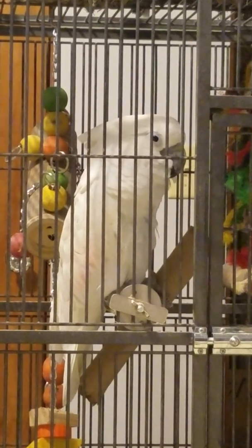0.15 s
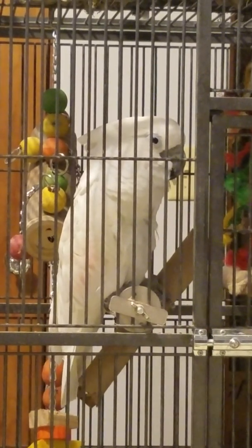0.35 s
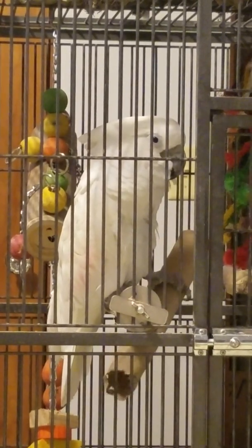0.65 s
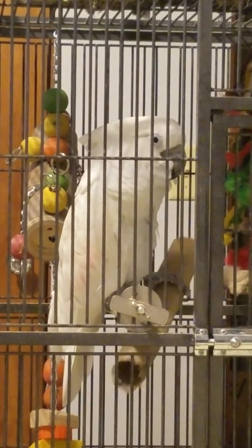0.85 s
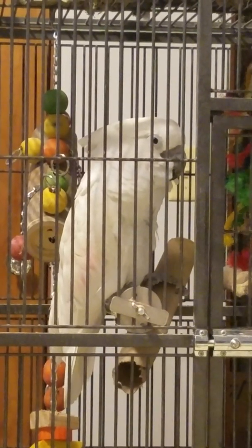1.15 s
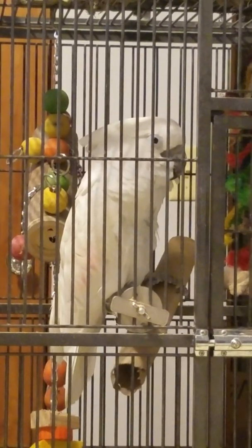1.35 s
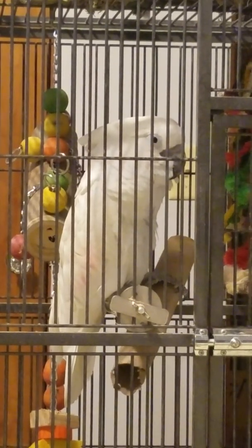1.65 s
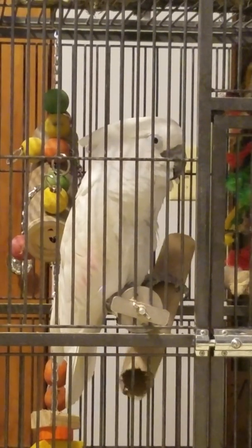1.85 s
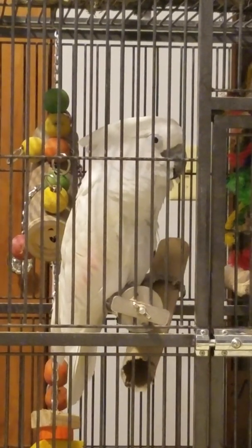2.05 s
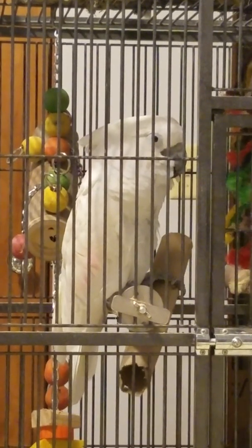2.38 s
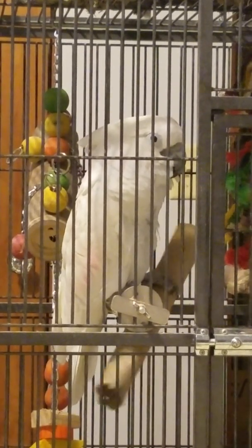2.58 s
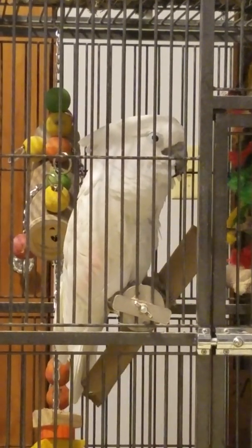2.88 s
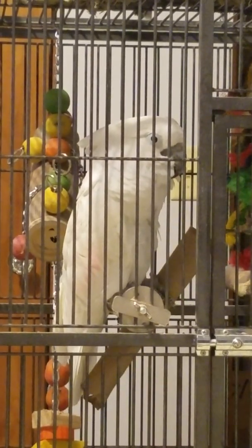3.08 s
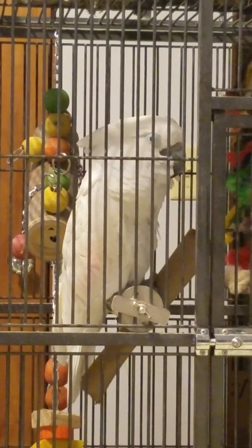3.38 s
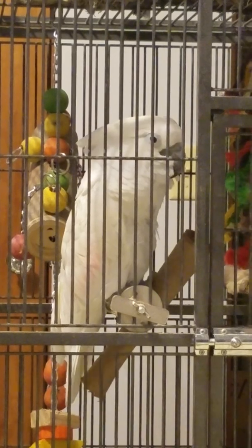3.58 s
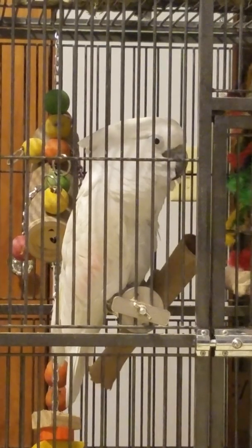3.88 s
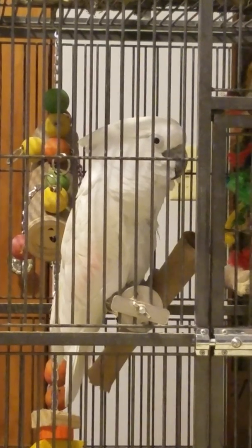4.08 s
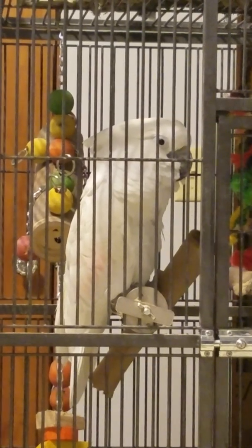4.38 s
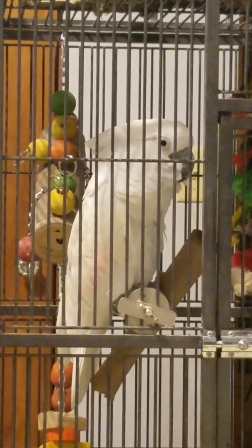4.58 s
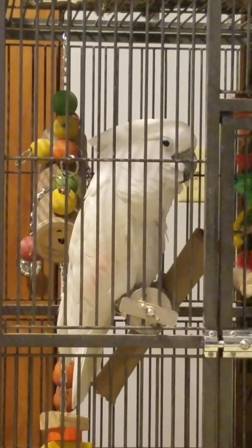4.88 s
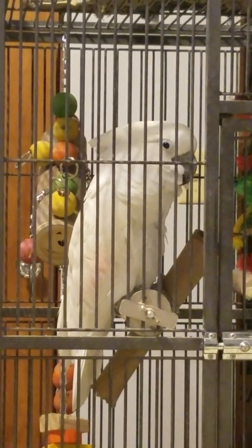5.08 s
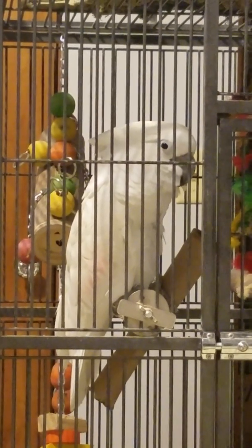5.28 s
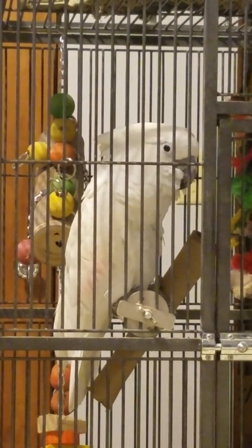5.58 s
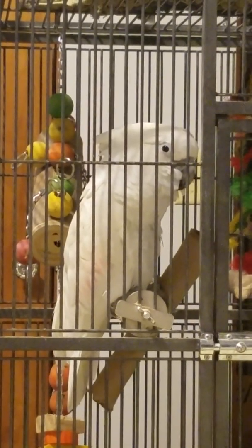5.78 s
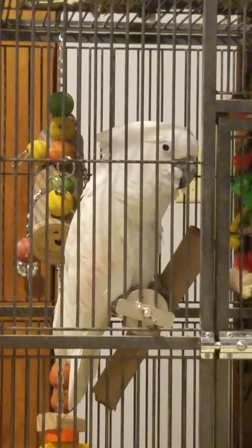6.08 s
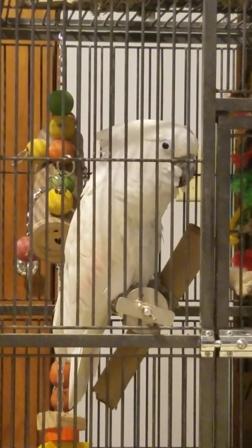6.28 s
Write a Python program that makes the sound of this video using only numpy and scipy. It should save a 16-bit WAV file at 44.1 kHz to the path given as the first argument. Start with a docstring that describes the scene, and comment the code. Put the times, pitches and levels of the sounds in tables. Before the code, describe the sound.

A caged parrot calls close to a stereo microphone in a reverberant room. Three rounded chirps come in the first second, followed by a squeal that climbs and cracks. Wood rattles and thumps a little further off. Then a hoarse squeal, a second short double burst, crisp beak snaps and a light regular clicking lead to a final rasping, whistling squeal. A steady soft fan hum lies beneath.

```python
"""Three mellow chirps of a caged cockatoo in a live room come first, then four rising squeals that break into rasp.
Each call is a bank of harmonics on a gliding pitch, shaped by the throat and roughened by slips, with hiss.
Between the calls the beak clicks, as short noise bursts; wood knocks and clatters further off, as rattles with
ringing modes. A ventilation hum of filtered noise and wavering tones lies under everything.
Decaying noise gives the room, and the two microphone ports colour the sound differently."""
import sys
import numpy as np
from scipy import signal
from scipy.fft import rfft, irfft
from scipy.io import wavfile
from scipy.ndimage import uniform_filter1d

SR = 44100
rng = np.random.default_rng(int(sys.argv[2]) if len(sys.argv) > 2 else 0)


def waveform_to_disk(signal):
    """Save audio, clipped to [-1, 1], as 16-bit WAV at the path in sys.argv[1]."""
    frames = np.transpose(np.atleast_2d(signal))
    scaled = np.clip(frames, -1, 1) * 32767
    samples = np.round(scaled).astype(np.int16)
    wavfile.write(sys.argv[1], SR, samples)


N = 284445
TIME = np.arange(N) / SR  # [s]
BINS = np.fft.rfftfreq(N, 1 / SR)  # [Hz]
TOP_HZ = 15850  # upper limit of the harmonics and of the ports


def undb(db):
    """Level to amplitude: 20 dB is a factor of ten."""
    return 10 ** (np.asarray(db) / 20)


def unit(x):
    """Normalization by signal power, to rms 1."""
    return x / np.sqrt(np.mean(x ** 2) + 1e-24)


def read(points, hz):
    """Interpolation of (frequency [Hz], value) on a logarithmic frequency axis."""
    f, value = np.transpose(points)
    return np.interp(np.log(np.maximum(hz, 1)), np.log(f), value)


def colour(x, db):
    """Minimum-phase filtering: folding the cepstrum makes a causal response from the dB at every bin."""
    cepstrum = irfft(np.log(undb(db)), N)
    cepstrum[1:N // 2] *= 2
    cepstrum[N // 2:] = 0
    return irfft(rfft(x) * np.exp(rfft(cepstrum)), N)


def flutter(size, hz):
    """Band-limited random motion: white noise low-passed at hz, with rms 1."""
    lowpass = signal.butter(2, hz, fs=SR, output="sos")
    return unit(signal.sosfilt(lowpass, rng.standard_normal(size)))


def add(track, s, sound):
    """Superposition of a sound on a track at time s."""
    start = max(int(s * SR), 0)
    track[start:start + len(sound)] += sound[:N - start]


def cockatoo(hiss_db=-26, chirp_hiss_db=-24):
    """Two-sided syrinx: mellow chirps and two-voiced squeals, with turbulent hiss that follows the tone."""
    # One row a note: (start [s], length [s], level [dB], attack [s], start pitch [Hz], top pitch [Hz],
    # rise [s], overtones re fundamental, ahead of the throat, at mid-note [dB], mid-note roughness [0-1])
    chirp_notes = [(0, 0.0986, -43.5, .004, 1318, 1453, 0.0491, 4, 0.26),
                   (.303, 0.1809, -41, 0.0124, 1233, 1737, .16, 6, 0.12),
                   (0.579, 0.367, -40.5, 0.0138, 1189, 1304, .075, 9.5, .075)]
    # Low, raspy side of the syrinx in the squeals; same columns
    rasp_notes = [(1.209, 0.15, -54, 0.058, 1894, 1975, 0.054, -11, 0.1068),
                  (1.295, 0.2142, -43, 0.019, 2027, 2582, 0.1756, -15, .27),
                  (3.411, 0.1624, -48.5, 0.055, 1745, 2474, .13, 2, .44),
                  (3.848, 0.087, -42.5, 0.0292, 1803, 2291, 0.054, 8, 0.49),
                  (3.96, .18, -45, 0.051, 2347, 2745, .115, 9, 0.6),
                  (5.34, 0.194, -50.5, 0.049, 1787, 2383, 0.113, 0.5, .4),
                  (5.525, .15, -46.5, 0.0554, 1900, 2382, .1, 3, 0.646)]
    # High side of the syrinx, whistling in the later squeals; same columns
    whistle_notes = [(3.499, 0.1503, -43, 0.0053, 3094, 3224, 0.0287, -7.5, 0.2),
                     (3.88, .175, -44, 0.0064, 2870, 3103, 0.02525, 6.5, 0.455),
                     (3.977, 0.073, -40, 0.0079, 4044, 4029, 0.0185, -33.5, 0.0955),
                     (5.42, 0.2664, -44.5, 0.0485, 2750, 3255, .055, -6, 0.31),
                     (5.645, 0.0376, -40.5, 0.0049, 3201, 3260, 0.014, -13, 0.1393),
                     (5.688, 0.0594, -38.5, 0.0117, 3290, 3278, 0.027, -12, 0.231)]
    # Spectrum of the hiss in the throat: (frequency [Hz], level [dB])
    hiss_colour = [(80, -56), (300, 8.5), (820, 3), (1300, -10), (3000, -2), (5600, -11), (8000, -16.5),
                   (10500, -15), (14000, -25.5)]

    # chirps are nearly pure: overtones fall steeply above the second harmonic
    chirps = sum(call(note, droop_octaves_per_s=1.4, dulling_db=10.5, fall_db=64,
                      sag=0.1334, waver=0.0059, rasp_hz=164, choke=0.56) for note in chirp_notes)
    rasps = sum(call(note, droop_octaves_per_s=0.41, dulling_db=14.5, fall_db=8.5,
                     sag=.36, waver=0.01785, rasp_hz=376.6, choke=0.404) for note in rasp_notes)
    whistles = sum(call(note, droop_octaves_per_s=0.0494, dulling_db=-3.5, fall_db=4.0,
                        sag=0.33, waver=0.0077, rasp_hz=251.0, choke=0.1) for note in whistle_notes)
    airflow = undb(chirp_hiss_db) * np.abs(chirps) + undb(hiss_db) * np.abs(rasps + whistles)
    hiss = unit(colour(rng.standard_normal(N), read(hiss_colour, BINS)))
    return chirps + rasps + whistles + hiss * uniform_filter1d(airflow, 400)  # averaged over 9 ms


def call(note, droop_octaves_per_s, dulling_db, fall_db, sag, waver, rasp_hz, choke):
    """Source and filter: syrinx harmonics weighted by the throat; slips lower the pitch and the strength.

    fall_db is the loss per octave above the second harmonic; sag and choke are the depths of a slip in
    log pitch and log strength, waver is the rms of log pitch.
    """
    # Resonances of throat and open beak: (frequency [Hz], level [dB])
    throat = [(900, 4), (1800, 9), (3100, 9.5), (4200, 5), (5100, 3.5), (6200, 3.5), (7200, -8.5),
              (8200, 0), (9400, -5.5), (10500, -12.5), (12800, -0.5), (15500, -18)]
    t, hz, db, overtone_db, rough = gesture(note, droop_octaves_per_s, dulling_db)
    drop_octaves, jump_db = cracks(t)
    # the taut membrane holds a top pitch and keeps slipping below it
    slips = rough * np.maximum(flutter(len(t), rasp_hz), 0)
    wander = waver * flutter(len(t), 67.9)
    hz = hz * 2 ** -drop_octaves * np.exp(wander - sag * slips)
    phase = 2 * np.pi * np.cumsum(hz) / SR

    k = np.arange(1, 9)[:, None]  # harmonic number
    overtone_level_db = (k > 1) * (overtone_db - fall_db * np.log2(k / 2))
    gains = undb(read(throat, k * hz) + overtone_level_db) * (k * hz < TOP_HZ)
    power = (gains ** 2).sum(0) / 2
    tone = (gains * np.sin(k * phase)).sum(0) / np.sqrt(power)
    # a slack membrane beats more weakly, so every slip is also a dip in strength
    tone = unit(tone * np.exp(-choke * slips))
    edges = np.clip(np.minimum(t - t[0], t[-1] - t) / 0.00051, 0, 1)  # short ramps at both ends
    track = np.zeros(N)
    add(track, t[0], tone * undb(db + jump_db) * edges)
    return track


def gesture(note, droop_octaves_per_s, dulling_db):
    """One push of air: pitch arches and droops, level swells and fades; roughness grows, brightness shifts."""
    swell_db, fade_db, fade_power = 6.5, 18, 3.944  # the fade grows ever faster
    crest_s = .06  # the pitch lingers at its top before it droops
    fray = 0.8102  # growth of roughness over the note, as a share of its mid-note value
    start, length, db, attack, start_hz, top_hz, rise, overtone_db, rough = note
    t = np.arange(0, length, 1 / SR)
    progress = t / length
    climb = np.sin(np.pi / 2 * np.minimum(t / rise, 1))
    after_top = np.maximum(t - rise, 0)
    droop_octaves = droop_octaves_per_s * (np.hypot(after_top, crest_s) - crest_s)
    hz = (start_hz + (top_hz - start_hz) * climb) * 2 ** -droop_octaves
    db = db - swell_db * np.maximum(1 - t / attack, 0) - fade_db * progress ** fade_power
    overtone_db = overtone_db - dulling_db * (progress - .5)
    rough = rough * (1 + fray * (progress - .5))
    return start + t, hz, db, overtone_db, rough


def cracks(t, stagger=0.4763, stagger_hz=260):
    """Voice instability: Gaussian dips of pitch [octaves], randomly staggered, with level jumps [dB]."""
    # Breaks of the voice: (time [s], half length [s], mean pitch drop [octaves], level change [dB])
    voice_breaks = [(0.061, .005, 0.208, 7), (0.45, 0.00379, .26, 14), (1.487, .018, 0.558, -4.5),
                    (3.635, 0.01564, .25, 4.5), (5.578, .02, .3, 0.5), (5.723, .011, 0.29, -4.5)]
    s, width, drop, db = np.transpose(voice_breaks)
    bumps = np.exp(-((t[:, None] - s) / width) ** 2)
    drop_octaves = bumps @ drop * (1 + stagger * flutter(len(t), stagger_hz))
    return drop_octaves, bumps @ db


def beak(gain_db=5):
    """Impact of the mandibles: each snap is a tiny dry noise burst with exponential decay."""
    # Single snaps: (time [s], level ahead of gain_db [dB])
    single_snaps = [(3.0101, -53), (3.0174, -48), (4.149, -40.5), (4.1554, -50.5), (4.2083, -49),
                    (4.2832, -53)]
    # Spectrum of a snap: (frequency [Hz], level [dB])
    beak_colour = [(600, -22), (2000, -9), (3700, -0.5), (4700, -2.5), (5600, -2.5), (7000, -4),
                   (8400, -11), (10000, -22.5), (15000, -16)]
    track, t = np.zeros(N), TIME[:SR // 50]
    decay = np.exp(-t / .0012)
    for s, db in [*single_snaps, *chatter(count=11)]:
        add(track, s, undb(db + gain_db) * rng.standard_normal(len(t)) * decay)
    return colour(track, read(beak_colour, BINS))


def chatter(count):
    """Periodic impacts: evenly spaced clicks whose scattered level sinks, as (time [s], level [dB])."""
    start_s, period_s = 4.386, .0779
    first_db, fade_db_per_s, scatter_db = -54, 7, 2.03
    since = period_s * np.arange(count)
    db = first_db - fade_db_per_s * since + scatter_db * rng.standard_normal(count)
    return list(zip(start_s + since, db))


def knocks(grain=0.522, build=0.08):
    """Contact noise and modal ringing: each rattle of contacts swells and decays over a set of wood modes."""
    # Knocks, scrapes and, at 3.01 s, the body of a beak snap:
    # (time [s], level [dB], treble re bass [dB], rattle decay [s], ring [dB])
    knock_events = [(.365, -55, -10, 0.0495, -27), (.736, -48.5, -30, 0.0333, -22.5),
                    (1.285, -52, 2.5, 0.0205, -27), (1.825, -46.5, 2, 0.00988, -28),
                    (2.057, -45, 6, 0.0272, -12.5), (2.095, -51, 6.5, 0.0188, -27),
                    (2.131, -46.5, 1, 0.0145, -10), (2.29, -66, -31, 0.13, -1),
                    (2.407, -49, -26.5, 0.0135, -27), (2.445, -50, -17, 0.008, -40.5),
                    (2.517, -48.5, 0, 0.015, -22), (2.583, -58.5, 7, 0.005, -32),
                    (3.0108, -57, 10, 0.0031, -25), (3.223, -75, 12, 0.052, -21.5),
                    (5.12, -61.5, -25.5, 0.0178, -20.5)]
    # Spectrum of one contact: (frequency [Hz], level [dB])
    knock_colour = [(30, -50.5), (110, -22), (250, -11), (380, -9.5), (560, -9.5), (790, 2), (1000, -3.5),
                    (1600, -4.5), (2200, -2), (4000, -12), (7000, -15.5), (8700, -19), (10200, -26.5),
                    (15500, -26)]
    # Modes of the knocked wood: (frequency [Hz], level [dB], decay by 60 dB [s])
    wood_modes = [(312.3, -15, .5), (373.5, -0.5, 0.43), (1131, -.5, 0.85), (1408.4, -0.5, 0.27),
                  (1570.4, 3, 0.255), (1830, -9, 0.17), (2120, -12, 0.24)]
    track, t = np.zeros(N), TIME[:SR // 2]
    crack = colour(signal.unit_impulse(N), read(knock_colour, BINS))[:len(t)]
    crack = unit(crack) / np.sqrt(len(t))  # unit energy
    ring = sum(undb(db - 60 * t / t60) * np.sin(2 * np.pi * hz * t) for hz, db, t60 in wood_modes)
    lowpass = signal.butter(1, 2500, fs=SR, output="sos")
    for s, db, treble_db, length, ring_db in knock_events:
        pressure = np.exp(-t / length) * np.clip(0.49 + t / (build * length), 0, 1)
        contacts = pressure * rng.standard_normal(len(t)) * np.exp(grain * flutter(len(t), 668))
        low = signal.sosfilt(lowpass, contacts)
        rattle = signal.fftconvolve(low + undb(treble_db) * (contacts - low), crack)[:len(t)]
        add(track, s, undb(db) * (rattle + undb(ring_db) * ring))
    return track


def ventilation(alike_hz=600, waver_db=0.5):
    """Turbulent rush, coherent between the ports in the bass, and a motor hum wavering in level and phase."""
    # Spectrum of the rush of air: (frequency [Hz], level [dB])
    air_colour = [(15, -65.5), (25, -12.5), (43, -22), (123, -2), (157, -8.5), (235, -9.5), (333, -3),
                  (361, -6), (473, -1), (542, -9.5), (620, -9), (2030, -16), (2330, -18), (2730, -18.5),
                  (9800, -32), (12500, -29.5), (15800, -27)]
    # Tones of the motor: (frequency [Hz], rms level [dB])
    hum_tones = [(119, -77), (238, -81), (360.5, -77), (474, -86)]
    air_db = -66  # rms of the part common to both ports
    mid, side = colour(rng.standard_normal((2, N)), read(air_colour, BINS))
    side = colour(side, -10 * np.log10(1 + (alike_hz / (BINS + 100)) ** 2))  # the ports differ less in the bass
    air = undb(air_db) * (mid + side * np.array([[1], [-1]])) / np.std(mid)
    hum = np.zeros(N)
    for hz, db in hum_tones:
        strength = undb(db + waver_db * flutter(N, 6.3)) * np.sqrt(2)
        phase = 2 * np.pi * hz * TIME + 0.47 * flutter(N, 2.3)
        hum += strength * np.sin(phase)
    return air + hum


def room(x, direct_db, wet_db, lag_s, early_db):
    """Reverberation: direct sound at two ports, sparse reflections, and a diffuse tail decaying by frequency."""
    # Reverberation time: (frequency [Hz], decay by 60 dB [s])
    room_t60 = [(150, 1), (1000, 0.4894), (2800, 0.4048), (6000, 0.3497), (14000, 0.1533)]
    t = TIME[:SR * 3 // 4]
    f, frames, noise = signal.stft(rng.standard_normal((2, len(t))), SR, nperseg=256)
    fade = np.exp(-np.log(1000) * frames / read(room_t60, f)[:, None])
    tail = signal.istft(noise * fade, SR)[1][:, :len(t)] * np.clip(t / 0.00853, 0, 1)
    response = undb(wet_db) * unit(tail) / np.sqrt(len(t))
    for port in range(2):
        lags = (SR * rng.uniform(.002, .02, size=6)).astype(int)
        response[port, lags] += undb(early_db) * rng.choice([-1, 1], size=6)
        response[port, int(port * abs(lag_s) * SR)] += undb(direct_db)  # the second port hears it later
    return signal.fftconvolve(x[None], response, axes=1)[:, :N]


def scene():
    """Direct-to-reverberant balance gives distance: the beak is driest, the knock layer comes mostly by the room."""
    bird = room(cockatoo(), direct_db=-2.5, wet_db=-1.5, lag_s=.00016, early_db=-11.5)
    ticks = room(beak(), direct_db=6, wet_db=-5.0, lag_s=.0001, early_db=-3.0)
    wood = room(knocks(), direct_db=-1.0, wet_db=1.5, lag_s=.00015, early_db=-10)
    return bird + ticks + wood + ventilation()


def record(dry):
    """Port response: opposite spectral tilts at left and right, then a steep elliptic low-pass."""
    # Difference between the microphone ports: (frequency [Hz], left minus right [dB])
    port_difference = [(60, -6.5), (200, 6.5), (380, 8), (700, 6), (2400, 5), (4400, 6), (6000, -4.5),
                       (8100, -9.5), (9500, -3.5), (11000, 2.5), (15000, 0)]
    tilt_db = read(port_difference, BINS) / 2
    ports = np.array([colour(dry[0], tilt_db), colour(dry[1], -tilt_db)])
    lowpass = signal.ellip(10, .2, 70, TOP_HZ, fs=SR, output="sos")
    return signal.sosfilt(lowpass, ports)


dry = scene()
out = record(dry)
waveform_to_disk(out)
```